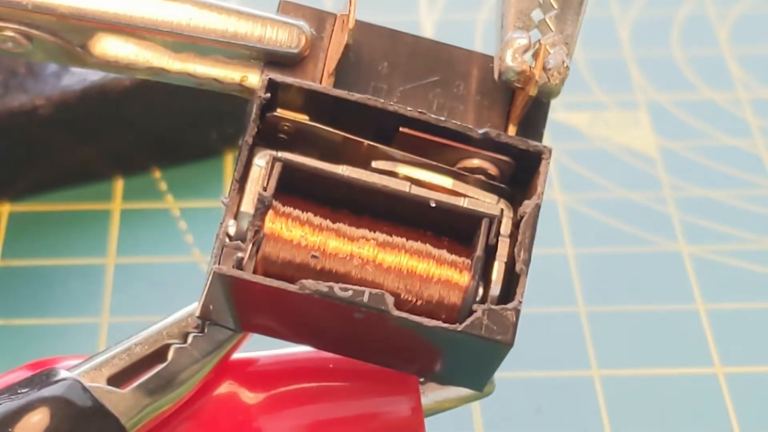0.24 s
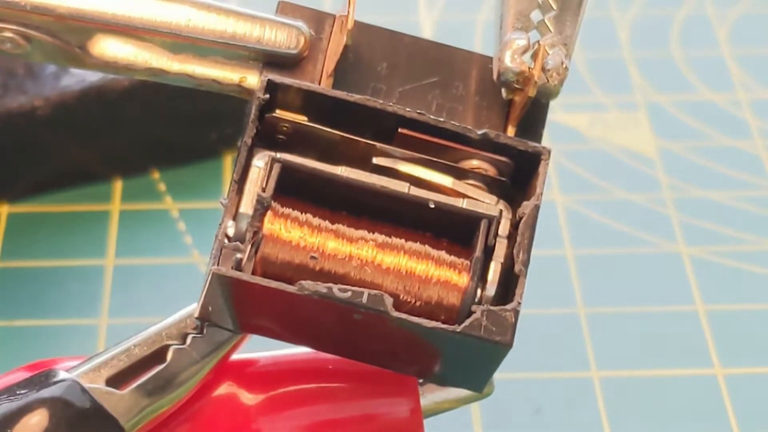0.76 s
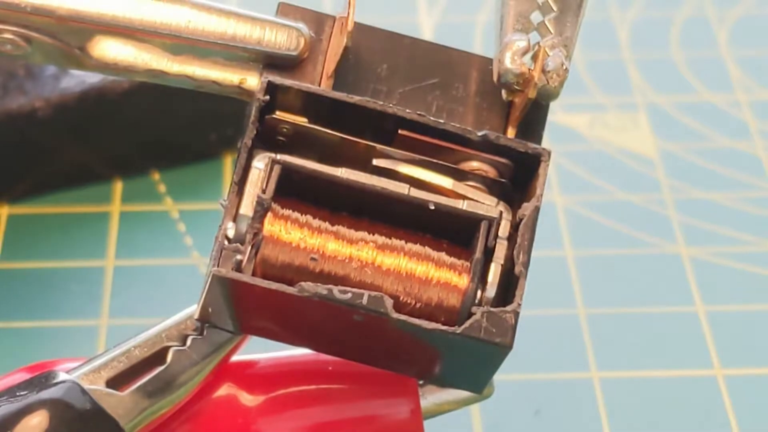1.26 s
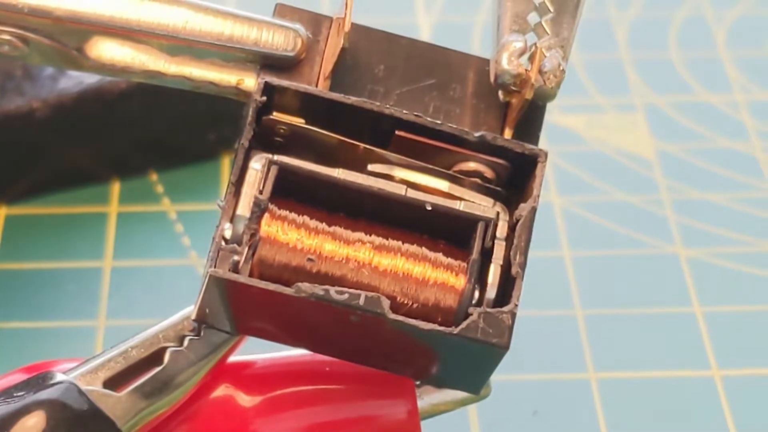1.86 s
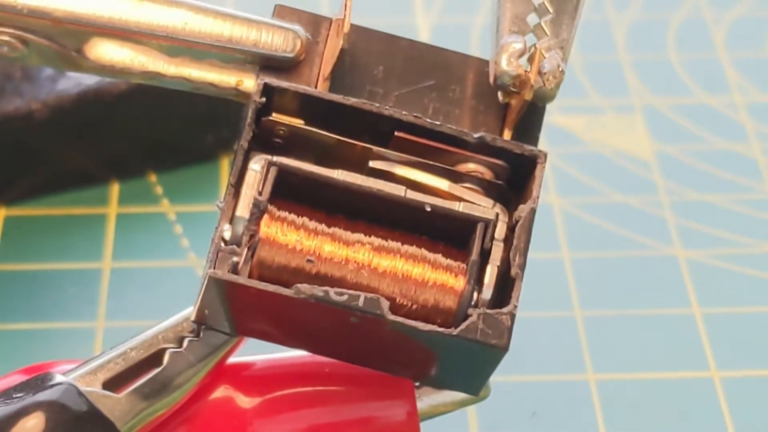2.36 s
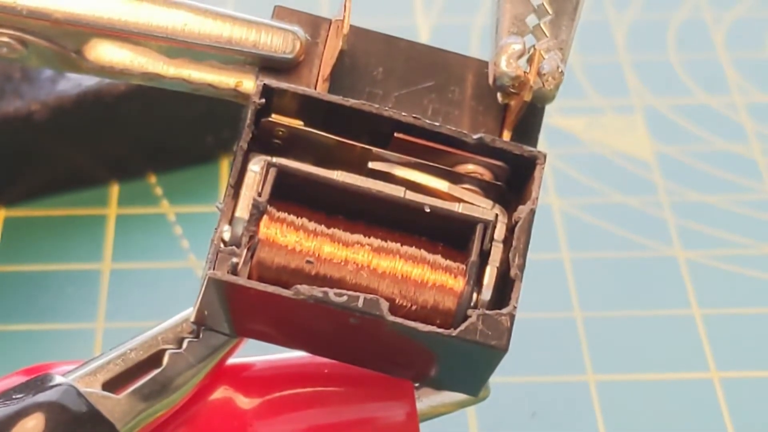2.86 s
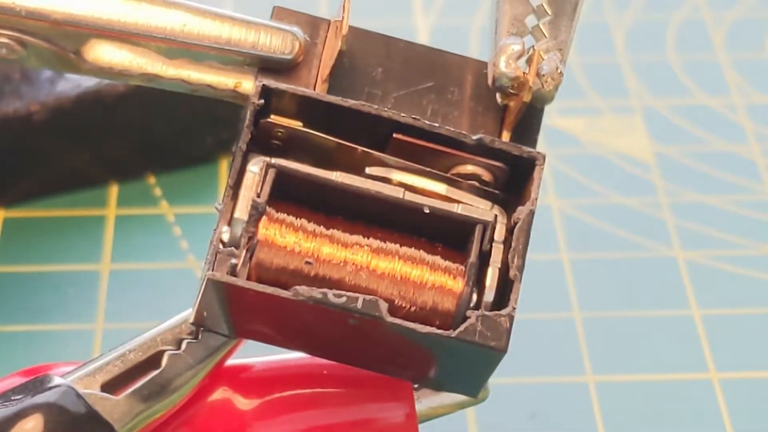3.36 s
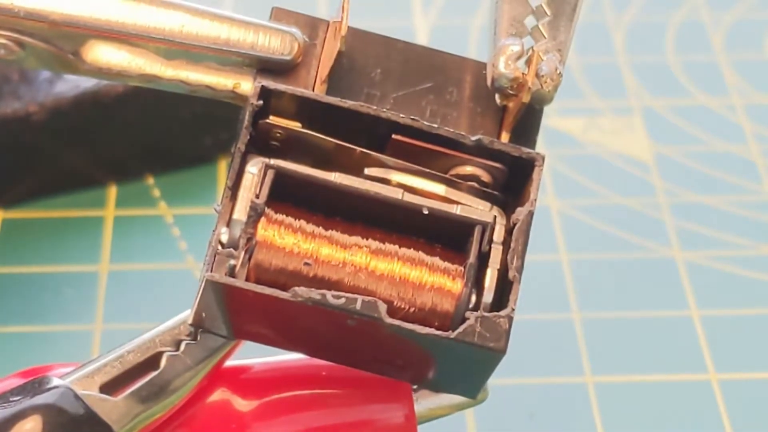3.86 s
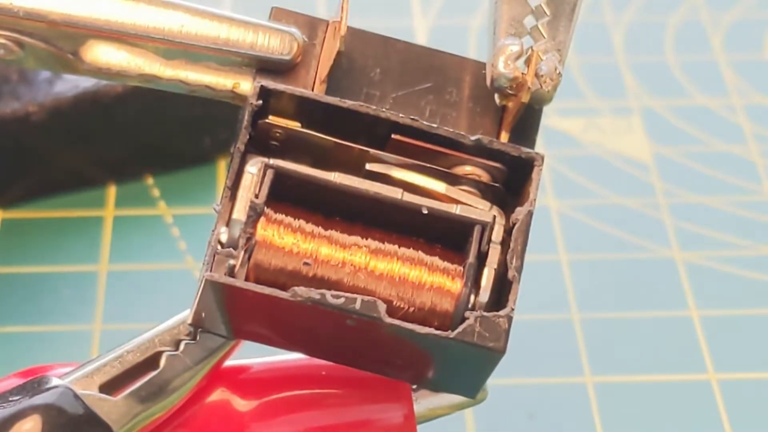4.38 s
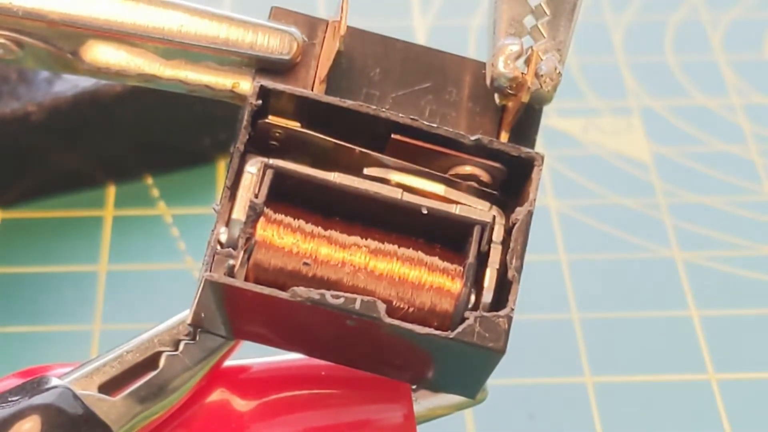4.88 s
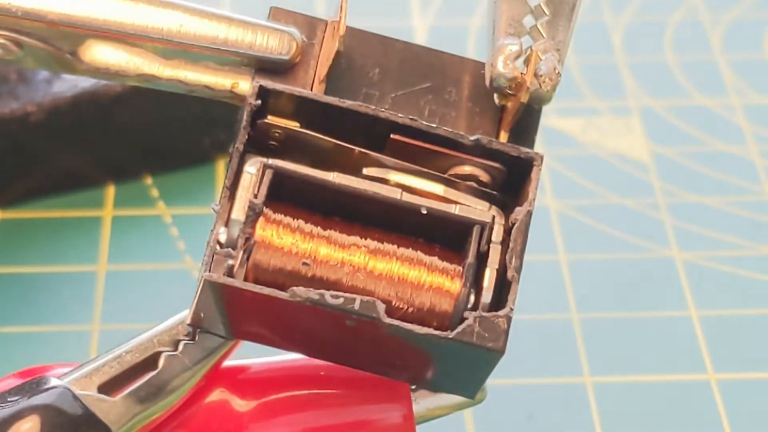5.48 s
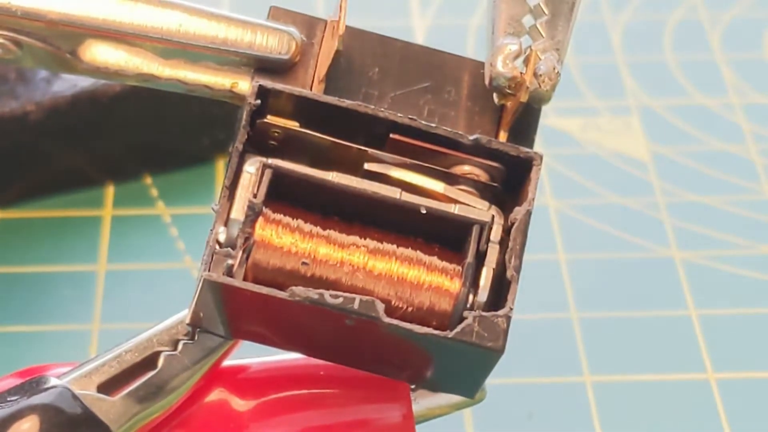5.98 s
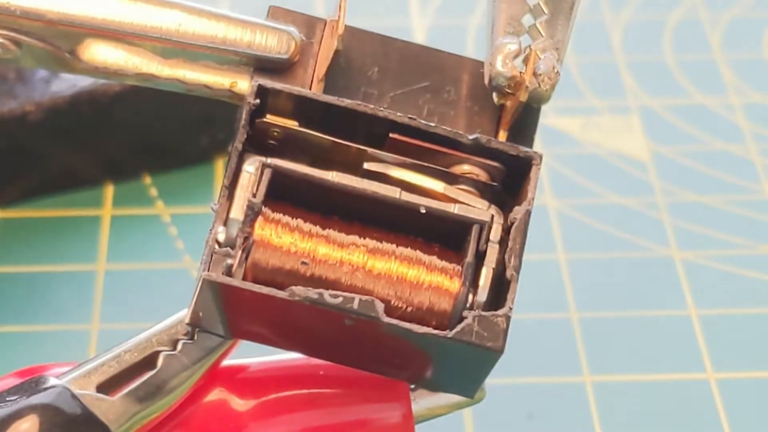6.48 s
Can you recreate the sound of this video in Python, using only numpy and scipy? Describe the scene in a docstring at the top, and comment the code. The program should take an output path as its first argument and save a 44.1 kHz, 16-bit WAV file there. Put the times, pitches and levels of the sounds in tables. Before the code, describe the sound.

Four uneven rounds of small mechanical clicking over quiet steady fan air. The relay's metal armature snaps in sharp and close; a fraction of a second later a switch clacks farther off, ringing into a small live room. A barely noticeable tick follows, then the armature falls back with a tiny, quieter rattle. The first round is heaviest, with a woody knock and low bench thud. Close stereo pickup, faint hum and hiss beneath.

```python
"""An opened relay on a workbench switches on and off four times, close to a pair of microphone ports.
Per cycle: the armature snaps onto the core, a farther switch clacks and pings into the room,
a soft tick, then the armature falls back and bounces. Impacts are shaped noise plus ringing modes and room.
Noise knocks and board modes add thuds, mostly in the first cycle.
Throughout: fan noise with resonances, a faint low hum of wavering tones, a very faint hiss."""
import sys
import numpy as np
from scipy import signal
from scipy.fft import rfft, irfft, next_fast_len
from scipy.io import wavfile
from scipy.ndimage import uniform_filter1d, map_coordinates

SR = 44100
rng = np.random.default_rng(int(sys.argv[2]) if len(sys.argv) > 2 else 0)


def materialize(psi):
    """Save the field psi as 16-bit PCM at rate SR to the path in sys.argv[1].

    A 1-D psi becomes a single channel; in a 2-D psi each row is a channel.
    """
    bounded = np.clip(np.atleast_2d(psi).T, -1, 1)
    quanta = np.round(bounded * 32767).astype(np.int16)
    wavfile.write(sys.argv[1], SR, quanta)


N = 296793  # samples

# Levels are relative unless marked rms.
# Fan air noise spectrum: f/Hz, density/dB
AIR_SPECTRUM = [(20, -42), (34, -35), (45, -3.5), (60, -22), (90, -16), (125, -4), (200, 2.5), (400, -2.5),
                (620, 3), (950, -9.5), (1800, -15), (3500, -27), (6000, -33.5), (9000, -81)]
# Fan resonances, lower set: f/Hz, width/Hz, level/dB
DUCT_MODES = [(170.9, 14, -4), (233.7, 10, -6), (309.2, 20, -10), (470, 50, -8), (541, 30, 2.5),
              (631, 22, -8), (824, 40, -11)]
# Fan resonances, weaker upper set: f/Hz, width/Hz, level/dB
CASE_MODES = [(1288, 134, 4.5), (1580, 99, 2), (1838, 19, 1.5), (2358, 36, 0)]
# Left-right likeness of the fan at the spaced ports: f/Hz, likeness/1
FAN_ALIKE = [(50, .85), (170, .91), (260, .88), (420, .7), (540, .84), (620, .65), (700, .3), (820, .5),
             (1150, .85), (1420, .65), (1700, .25), (5000, .1), (12000, .7)]
# Left port's phase lead for the fan, near opposite phase at 1 kHz: f/Hz, lead/rad
FAN_LEAD_RAD = [(130, .05), (520, .4), (620, .8), (820, 1.7), (990, 2.85), (1420, 3.5), (1900, 6.3)]
# Hum tones: f/Hz, level/dB rms
HUM_TONES = [(119.5, -64.5), (172, -60), (233, -60)]
# Hiss spectrum: f/Hz, density/dB
HISS_SPECTRUM = [(1500, -28), (5000, 2.5), (7000, 6), (10000, -0.5), (15500, -4.5)]

# Armature lands on the core: t/s, level/dB, tilt/(dB/octave)
PULL_IN_EVENTS = [(.5448, -6, -2.5), (2.1716, -5, 2), (3.9868, -6, 2), (5.6640, -6.5, 0.5)]
# Contacts as the armature seats: delay/s, level/dB
SEATING_CONTACTS = [(0, 0), (.0012, -2), (.0032, -6), (.008, -13), (.013, -12), (.021, -19)]
# Modes of the closed relay: f/Hz, width before damping factor/Hz, spectral peak/dB
CLOSED_MODES = [(3860, 150, -10), (4880, 90, -9), (5160, 150, -7), (5460, 70, -4), (5680, 70, -6),
                (5980, 40, -8), (6750, 110, -12), (7200, 200, -9), (7760, 55, -6), (8173, 32, 4),
                (9480, 110, -7), (10320, 170, -8), (11100, 70, -13), (11400, 90, -11), (11790, 90, -11),
                (12320, 77, -12), (13160, 120, -11), (13740, 200, -10), (14250, 149, -12), (14890, 77, -16)]
# Short-lived dense modes, relay closed: f/Hz, density/dB
CLOSED_SPECTRUM = [(200, -15), (1000, -19), (2000, -16), (3200, -12), (3800, -6), (4500, -1), (5400, 7),
                   (6400, -5), (7500, 3), (9000, -1), (9600, -2), (12500, -1), (13900, -2), (15500, -9)]

# Housing knocks on the bench: t/s, level/dB, t60/s, treble corner/Hz
KNOCK_EVENTS = [(.5450, 5, 0.0098, 8700), (.5445, 4.5, 0.12, 3000), (.7280, 1.5, 0.26, 260),
                (.728, 2.5, 0.14, 4000), (4.9429, -11.5, 0.037, 720)]
# Knock spectrum: f/Hz, density/dB
HOUSING_SPECTRUM = [(30, -60), (75, -75), (115, -27), (170, 10.5), (250, 2), (350, 2.5), (600, 2),
                    (850, -2), (1100, 0.5), (1750, 3), (3200, -5), (5500, 2), (9000, 2), (12000, 1),
                    (15500, -10)]
# First two blows jolt the bench: t/s, level/dB, tilt/(dB/octave)
JOLT_EVENTS = [(.5447, -0.5, 4), (.7290, -3.5, -2.5)]
# Modes of the bench board: f/Hz, width before damping factor/Hz, spectral peak/dB
BENCH_MODES = [(118, 5.4, -0.5), (182, 16, -4), (339, 21, 0), (538, 37, -9.5), (822, 56, -11),
               (1187, 61, -22.5), (1690, 66, -15), (1906, 48, -13.5)]

# Farther switch clacks: t/s, level/dB, tilt/(dB/octave), spring ping/dB
CLACK_EVENTS = [(0.7264, -6.5, -1.2, -6), (2.3153, -6, 1, -9.5), (4.1303, -6, 1, -8),
                (5.8100, -8.5, 1.1, -5)]
# Contacts as the switch throws over: delay/s, level/dB
TOGGLE_CONTACTS = [(0, 0), (.0016, -4)]
# Modes of the switch: f/Hz, width before damping factor/Hz, spectral peak/dB
SWITCH_MODES = [(1895, 50, -7), (2340, 200, -9), (2880, 40, 1), (2960, 170, -7), (3210, 70, -9),
                (4490, 150, -12), (5230, 90, -10), (5510, 90, -11), (6430, 55, -10), (6690, 45, -3),
                (6850, 55, 0), (7060, 240, -8), (7225, 45, 1), (7400, 220, -8), (7845, 45, 3),
                (8750, 130, -6), (9170, 150, -8), (10240, 88, -16), (11870, 150, -10), (12870, 130, -19),
                (13690, 200, -16)]
# Short-lived dense modes of the switch: f/Hz, density/dB
SWITCH_SPECTRUM = [(200, -22), (700, -2), (1500, -1), (2900, 4.5), (3900, -2), (5400, 0.5), (6300, -1),
                   (7500, 7), (8400, 1.5), (9000, 2.5), (10000, -2.5), (11900, -1), (13500, -5),
                   (15500, -12)]
# Modes of the switch spring: f/Hz, width/Hz, spectral peak/dB
PING_MODES = [(6850, 190, 0), (7130, 230, -1)]

# Soft ticks before the relay lets go: t/s, level/dB, tilt/(dB/octave)
TICK_EVENTS = [(1.2358, -18, -0.5), (2.9620, -17, -1.1), (4.655, -18, -0.1), (6.3780, -18, -0.5)]
# Contacts of a soft tick: delay/s, level/dB
PRESS_CONTACTS = [(0, 0), (.0028, -1), (.009, -8), (.016, -6)]
# Modes of the tick: f/Hz, width before damping factor/Hz, spectral peak/dB
TICK_MODES = [(4520, 110, -6), (5540, 110, -5), (6790, 55, -4), (7240, 48, -1), (8190, 39, 0),
              (8810, 56, 0), (11300, 39, -3), (11800, 69, -2), (12800, 100, -6), (14000, 54, -6)]
# Short-lived dense modes of the tick: f/Hz, density/dB
TICK_SPECTRUM = [(150, -6), (620, 25.5), (1100, 10.5), (2000, 5.5), (4000, -8.5), (5400, -7), (6400, -3),
                 (7500, -1), (9000, 2), (12000, 1.5), (15500, -2)]

# Armature falls back: t/s, late rebound/dB
DROP_OUT_EVENTS = [(1.4872, -5), (3.2157, -1), (4.9292, 0), (6.6317, -8)]
# Contacts part, then the armature hits its stop and bounces: delay/s, level/dB
BOUNCE_CONTACTS = [(0, 0), (.002, -2), (.005, 2), (.007, -5), (.0095, -7), (.0165, -9), (.021, -12)]
# Modes of the open relay: f/Hz, width before damping factor/Hz, spectral peak/dB
OPEN_MODES = [(2350, 60, -19), (2750, 141, -15), (4410, 259, -16), (4860, 68, -18), (5660, 259, -13),
              (6050, 175, -19), (6820, 52, -7), (7180, 259, -4), (7760, 259, -8), (8090, 150, -6),
              (8680, 68, -18), (9440, 88, -7), (10250, 92, -8), (10470, 89, 1), (10680, 79, -4),
              (10910, 174, -5), (11310, 52, -14), (11960, 259, -12), (12800, 259, -10), (13140, 74, -8),
              (13380, 155, -14), (14100, 225, -11), (14610, 175, -13), (14840, 95, -11)]
# Short-lived dense modes, relay open: f/Hz, density/dB
OPEN_SPECTRUM = [(200, -20), (1000, -7), (2000, -14), (3700, -12), (5500, -0.5), (6300, -1.5), (7200, -2.5),
                 (8200, 5), (9000, -11), (10500, 0), (12200, 1), (14800, -1), (15700, -5)]

# Left-right likeness of the relay: f/Hz, likeness/1
NEAR_ALIKE = [(200, .9), (1100, .75), (2300, .3), (3500, .85), (5200, .25), (7000, .6), (14000, .6)]
# Left-right likeness of the farther switch: f/Hz, likeness/1
FAR_ALIKE = [(200, .7), (1100, .5), (2500, .25), (14000, .3)]
# Left-right likeness of the soft ticks: f/Hz, likeness/1 (clipped to -1..1 after interpolation)
TICK_ALIKE = [(500, 0.71), (1100, -1.05), (2200, -0.16), (6500, 0.37), (8000, 0.98)]
# Left-right likeness of the room's echo and the knocks: f/Hz, likeness/1
ROOM_ALIKE = [(200, .85), (550, .6), (1100, -.65), (2000, 0), (4800, 0), (6300, .5), (14000, .5)]
# Room decay: f/Hz, t60/s
ROOM_T60 = [(200, 0.19), (2500, 0.38), (7500, 0.31), (11000, 0.25), (16000, 0.17)]
# Room echo at the left port: f/Hz, gain/dB
LEFT_SHADE_DB = [(8000, 0), (10500, -3), (13000, -4), (15500, -1)]

CLUMP_DB = 2.5  # rms unevenness of the room's echo
PORT_LEAD_S = .00043  # left port's head start for relay and switch contacts, and the ping
DROP_DB, REBOUND_S = -12.5, .013
PING_LEFT_DB, PING_ROOM_DB = 0.5, -2.5  # left up, right down by the first
HISS_DB, HISS_EARLY_DB, HISS_SETTLE_S = -72, 5.5, 1.55  # settled rms, early excess, time to half excess
LOW_CUT_HZ, TOP_HZ = 34, 15700


def amp(db):
    """dB to amplitude factor."""
    return 10 ** (np.asarray(db) / 20)


def unit(x):
    """Scale to rms 1."""
    return x / np.sqrt(np.mean(x ** 2) + 1e-20)


def unit_energy(x):
    """Scale each channel to energy 1."""
    return x / np.sqrt(np.sum(x ** 2, axis=-1, keepdims=True) + 1e-20)


def along(points, hz):
    """Interpolate (f/Hz, value) points on a log frequency axis."""
    f, v = np.transpose(points)
    return np.interp(np.log(hz + 1), np.log(f + 1), v)


def peaks(modes, hz):
    """Gain of a set of resonances, their powers summed."""
    power = 0
    for centre_hz, width_hz, db in modes:
        power = power + amp(db) ** 2 / (1 + (2 * (hz - centre_hz) / width_hz) ** 2) ** 2
    return np.sqrt(power)


def noise(gain, alike, size, lead_rad=np.zeros_like):
    """Stereo noise of rms 1, shaped by gain(hz); mid/side balance sets likeness, lead_rad(hz) leads left."""
    m = next_fast_len(size + 4096)
    hz = np.fft.rfftfreq(m, 1 / SR)
    turn = np.arccos(np.clip(along(alike, hz), -1, 1)) / 2
    balance = [np.cos(turn), np.sin(turn)]
    mid, side = rfft(rng.standard_normal((2, m))) * gain(hz) * balance
    shift = np.exp(.5j * lead_rad(hz))
    pair = np.array([(mid + side) * shift, (mid - side) / shift])
    return unit(irfft(pair, m)[:, :size])


def add(track, s, sound):
    """Mix a sound into the track at time s."""
    part = track[:, max(round(s * SR), 0):][:, :sound.shape[1]]
    part += sound[:, :part.shape[1]]


def lead_in(spectrum, alike):
    """Faint noise of the part's own spectrum, swelling for 12.5 ms up to the first contact."""
    t = np.arange(SR // 80) / SR
    swell = noise(lambda hz: amp(along(spectrum, hz)), alike, len(t))
    return unit_energy(swell * (t / t[-1]) ** 2)


def crack(spectrum, alike, lead_s, tilt_db, crack_t60_s, body_t60_s, body_db):
    """One contact: noise with a fast crack decay and a slower one for the dense ring of small parts."""
    t = np.arange(SR // 6) / SR
    fast = unit_energy(amp(-60 * t / crack_t60_s))
    slow = amp(body_db) * unit_energy(amp(-60 * t / body_t60_s))
    gain = lambda hz: amp(along(spectrum, hz) + tilt_db * np.log2(hz + 1))
    lead_rad = lambda hz: 2 * np.pi * hz * lead_s
    return unit_energy(noise(gain, alike, len(t), lead_rad) * np.hypot(fast, slow))


def ringing(modes, contacts, lead_s, tilt_db, damping):
    """Clear modes of a part: each contact tops up their energy, which then drains away."""
    t = np.arange(SR // 3) / SR
    hz, width_hz, db = np.transpose(modes)[:, :, None]
    stored = 0
    for delay_s, hit_db in contacts:
        drain = np.exp(-2 * np.pi * damping * width_hz * abs(t - delay_s))
        stored = stored + amp(hit_db) ** 2 * (t >= delay_s) * drain
    mode_db = db + tilt_db * np.log2(hz) + rng.normal(0, 1.4, hz.shape)
    size = width_hz * amp(mode_db) * np.sqrt(stored)  # width factor turns spectral peak into amplitude
    phase = 2 * np.pi * (hz * t + rng.random(hz.shape))
    half_lead_rad = np.pi * hz * lead_s + rng.normal(0, 0.46, hz.shape)
    left = np.sum(size * np.cos(phase + half_lead_rad), axis=0)
    right = np.sum(size * np.cos(phase - half_lead_rad), axis=0)
    strength = np.linalg.norm([amp(hit_db) for _, hit_db in contacts])
    return strength * unit_energy(np.array([left, right]))


def room(gain):
    """Room's answer to a sound of spectrum gain(hz): uneven clumps of noise, decay set by frequency."""
    t = np.arange(SR // 2) / SR
    hz, age_s, z = signal.stft(noise(gain, ROOM_ALIKE, len(t)), SR, nperseg=256)
    grain = rng.standard_normal(z.shape[1:])
    clumps = unit(uniform_filter1d(uniform_filter1d(grain, size=7, axis=0), size=2, axis=1))
    tail_db = CLUMP_DB * clumps - 60 * age_s / along(ROOM_T60, hz)[:, None]
    tail = signal.istft(z * amp(tail_db), SR, nperseg=256)[1][:, :len(t)]
    tail = unit_energy(tail * (1 - np.exp(-t / 0.0047)))  # onset, time constant 4.7 ms
    shade_db = along(LEFT_SHADE_DB, np.fft.rfftfreq(len(t), 1 / SR))
    shade = amp(np.outer([1, 0], shade_db))  # left only
    return irfft(rfft(tail) * shade, len(t))


def movements(events, contacts, modes, spectrum, alike, lead_s, lead_in_db, dense_db, ring_db,
              damping, room_db, room_ring_db, **part):
    """Each movement: brief noise swell, a run of contacts of slightly random strength, their ring, the room."""
    track = np.zeros((2, N))
    for s, db, tilt_db in events:
        swell = lead_in(spectrum, alike)
        add(track, s - swell.shape[1] / SR, amp(db + lead_in_db) * swell)
        hits = [(delay_s, hit_db + rng.normal(0, 1.0)) for delay_s, hit_db in contacts]
        for delay_s, hit_db in hits:
            hit = crack(spectrum, alike, lead_s, tilt_db, **part)
            add(track, s + delay_s, amp(db + hit_db + dense_db) * hit)
        add(track, s, amp(db + ring_db) * ringing(modes, hits, lead_s, tilt_db, damping))

        def heard(hz):
            """Spectrum sent into the room: dense and clear modes, tilted."""
            dense = unit(amp(along(spectrum, hz)))
            clear = amp(room_ring_db) * unit(peaks(modes, hz))
            return np.hypot(dense, clear) * amp(tilt_db * np.log2(hz + 1))

        add(track, s, amp(db + room_db) * room(heard))
    return track


def fan():
    """Steady air noise plus two sets of resonant noise; phase between the ports varies with frequency."""
    lead_rad = lambda hz: along(FAN_LEAD_RAD, hz)
    air = amp(-45.5) * noise(lambda hz: amp(along(AIR_SPECTRUM, hz)), FAN_ALIKE, N, lead_rad)
    duct = amp(-45.0) * noise(lambda hz: peaks(DUCT_MODES, hz), FAN_ALIKE, N, lead_rad)
    case = amp(-59.5) * noise(lambda hz: peaks(CASE_MODES, hz), FAN_ALIKE, N, lead_rad)
    return air + duct + case


def hum():
    """Faint low sines, equal at both ports, each with a slow random phase drift."""
    t = np.arange(N) / SR
    tones = np.zeros(N)
    for hz, rms_db in HUM_TONES:
        drift = map_coordinates(rng.standard_normal(40), [4 * t], mode="nearest")  # 4 points/s
        tones += amp(rms_db) * np.sqrt(2) * np.sin(2 * np.pi * hz * t + 0.96 * drift)
    return tones


def hiss():
    """Very faint centred noise that starts a little higher and settles over the first seconds."""
    early = 1 / (1 + (np.arange(N) / SR / HISS_SETTLE_S) ** 4)
    level = amp(HISS_DB + HISS_EARLY_DB * early)
    return level * noise(lambda hz: amp(along(HISS_SPECTRUM, hz)), [(1000, 1.0)], N)


def pull_in():
    """The magnet snaps the armature onto the core and holds it: a short, bright click."""
    part = dict(crack_t60_s=.014, body_t60_s=.06, body_db=-3)
    return movements(PULL_IN_EVENTS, SEATING_CONTACTS, CLOSED_MODES, CLOSED_SPECTRUM, NEAR_ALIKE, PORT_LEAD_S,
                     lead_in_db=-11, dense_db=-1, ring_db=0, damping=.8,
                     room_db=-7.5, room_ring_db=-1, **part)


def knocks():
    """Switching can jolt the housing against the bench: decaying low-passed noise, raps to dull thuds."""
    track, t = np.zeros((2, N)), np.arange(SR // 2) / SR
    for s, db, t60_s, bright_hz in KNOCK_EVENTS:
        gain = lambda hz: amp(along(HOUSING_SPECTRUM, hz)) / np.sqrt(1 + (hz / bright_hz) ** 4)
        thud = noise(gain, ROOM_ALIKE, len(t))
        rise = 1 - np.exp(-t * bright_hz)  # duller knocks build up more slowly
        add(track, s, amp(db - 3.0) * unit_energy(thud * rise * amp(-60 * t / t60_s)))
    # high-pass at 100 Hz keeps the knocks free of deep bass
    return signal.sosfilt(signal.butter(4, 100, "highpass", fs=SR, output="sos"), track)


def bench():
    """A hard jolt sets the board under the relay ringing; its narrow lowest mode lingers."""
    track = np.zeros((2, N))
    for s, db, tilt_db in JOLT_EVENTS:
        add(track, s, amp(db) * ringing(BENCH_MODES, [(0.00037, 0)], 0, tilt_db, damping=0.8))
    return track


def switch():
    """A sprung switch farther away throws over, heard mostly through the room."""
    part = dict(crack_t60_s=.016, body_t60_s=0.21, body_db=2.0)
    events = [(s, db, tilt_db) for s, db, tilt_db, _ in CLACK_EVENTS]
    return movements(events, TOGGLE_CONTACTS, SWITCH_MODES, SWITCH_SPECTRUM, FAR_ALIKE, PORT_LEAD_S,
                     lead_in_db=-9.5, dense_db=-2.5, ring_db=-3.5, damping=1.1,
                     room_db=6.5, room_ring_db=-2.5, **part)


def spring():
    """The switch spring pings as it snaps over, harder in some throws: two modes, direct and in the room."""
    track = np.zeros((2, N))
    balance = amp([[PING_LEFT_DB], [-PING_LEFT_DB]])
    for s, _, _, ping_db in CLACK_EVENTS:
        ping = ringing(PING_MODES, TOGGLE_CONTACTS, PORT_LEAD_S, 0, damping=1)
        add(track, s, amp(ping_db) * balance * ping)
        add(track, s, amp(ping_db + PING_ROOM_DB) * room(lambda hz: peaks(PING_MODES, hz)))
    return track


def ticks():
    """A light, blunt touch in a few small steps, some way off: mostly room."""
    part = dict(crack_t60_s=.014, body_t60_s=.14, body_db=2)
    return movements(TICK_EVENTS, PRESS_CONTACTS, TICK_MODES, TICK_SPECTRUM, TICK_ALIKE, 0,
                     lead_in_db=-6, dense_db=-1, ring_db=-8, damping=1.5,
                     room_db=8.0, room_ring_db=-16, **part)


def drop_out():
    """The spring throws the armature back at one set level; it chatters on its stop, with a rebound."""
    part = dict(crack_t60_s=.014, body_t60_s=.07, body_db=-1)
    track = np.zeros((2, N))
    for s, rebound_db in DROP_OUT_EVENTS:
        contacts = BOUNCE_CONTACTS + [(REBOUND_S, rebound_db)]
        track += movements([(s, DROP_DB, 0)], contacts, OPEN_MODES, OPEN_SPECTRUM, NEAR_ALIKE, PORT_LEAD_S,
                           lead_in_db=-3.5, dense_db=-1.5, ring_db=1.5, damping=.9,
                           room_db=-1.0, room_ring_db=-1, **part)
    return track


def scene():
    """Relay, switch and bench over the fan, hum and hiss."""
    steady = fan() + hum() + hiss()
    relay = pull_in() + drop_out()
    return steady + relay + knocks() + bench() + switch() + spring() + ticks()


def record(dry):
    """The recorder cuts the deepest rumble and everything above its band limit."""
    m = next_fast_len(N + SR // 2)
    hz = np.fft.rfftfreq(m, 1 / SR)
    low_cut = (hz / LOW_CUT_HZ) ** 4 / np.sqrt(1 + (hz / LOW_CUT_HZ) ** 8)
    high_cut = 1 / np.sqrt(1 + (hz / TOP_HZ) ** 160)
    return irfft(rfft(dry, m) * low_cut * high_cut, m)[:, :N]


dry = scene()
out = record(dry)
materialize(out)
```